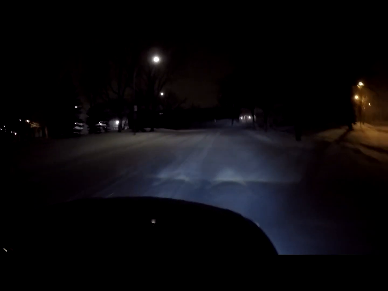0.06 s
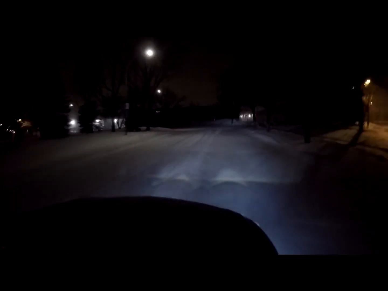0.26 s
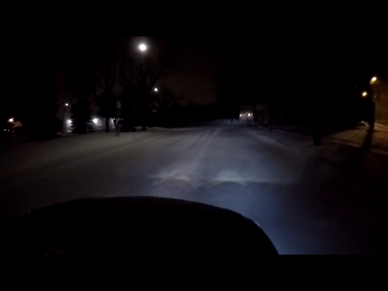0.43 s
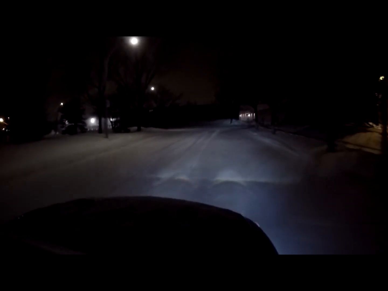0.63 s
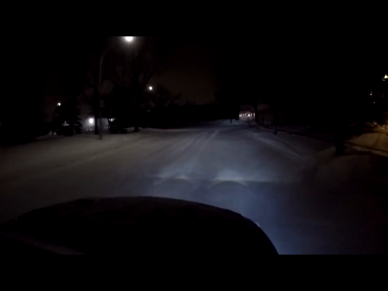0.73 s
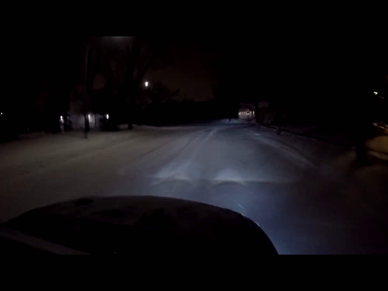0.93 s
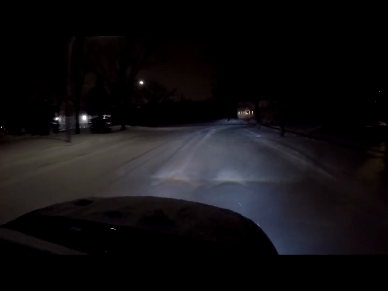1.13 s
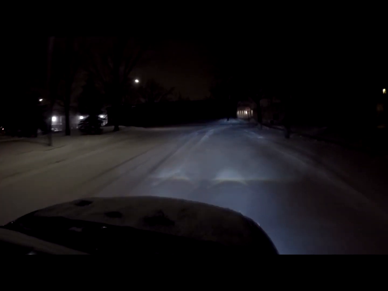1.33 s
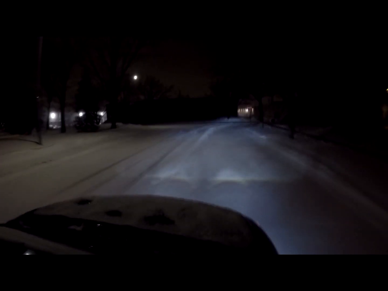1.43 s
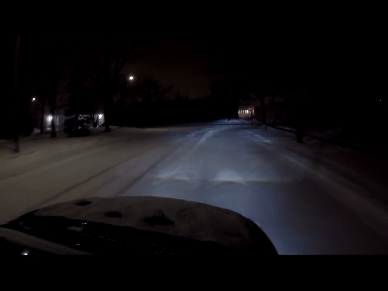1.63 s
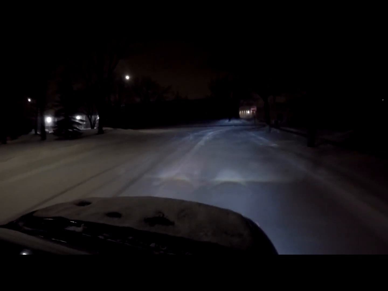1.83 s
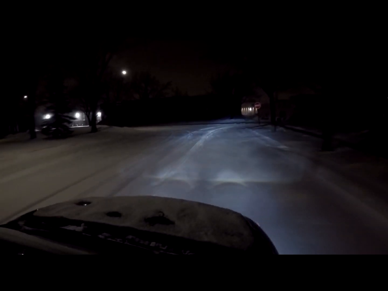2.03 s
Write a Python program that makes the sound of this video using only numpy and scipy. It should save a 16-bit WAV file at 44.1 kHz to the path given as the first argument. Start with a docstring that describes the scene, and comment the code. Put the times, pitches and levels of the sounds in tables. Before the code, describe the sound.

Heavy airstream roars and thumps against a cased microphone on a car driving along a road

```python
"""An airstream tears past a cased camera fixed outside a moving car.
Large eddies thump the case as low noise, with short low swells that stand out of it; small
ones rush over the microphone port as bright noise in short flurries, with sharp flutters.
Behind them lie a middle roar, a thin hiss, the car body's rumble and a few ticks of grit.
The noise layers are coloured and flickering; low swells and ticks are short swelling tones."""
import sys
import numpy as np
from scipy import signal
from scipy.fft import rfft, irfft
from scipy.io import wavfile
from scipy.ndimage import uniform_filter1d, minimum_filter1d

SR = 44100
rng = np.random.default_rng(int(sys.argv[2]) if len(sys.argv) > 2 else 0)


def generate_wav(signal):
    """Clip the signal to [-1, 1] and save it as 16-bit WAV at the path in sys.argv[1]."""
    frames = np.transpose(np.atleast_2d(signal))
    scaled = np.clip(frames, -1, 1) * 32767
    pcm = np.round(scaled).astype(np.int16)
    wavfile.write(sys.argv[1], SR, pcm)


N = 91110  # samples
SLEW_S = .005  # smoothing of every level curve


def undb(db):
    """Turn decibels into an amplitude factor."""
    return 10 ** (np.asarray(db) / 20)


def level_curve(table):
    """Draw a smoothed level line in dB through the table's points."""
    start_s, level_db = np.array(table).T
    line = np.interp(np.arange(N) / SR, start_s, level_db)
    return uniform_filter1d(line, int(SLEW_S * SR))


def walk(rate_hz):
    """Random levels held for 1 / rate_hz seconds and smoothed twice; spread about 0.6."""
    hold = int(SR / rate_hz)
    steps = np.repeat(rng.standard_normal(N // hold + 1), hold)
    smooth = uniform_filter1d(uniform_filter1d(steps, hold), hold)
    return 0.83 * smooth[:N]


def turbulence(colour, shared_db, shared_hz, own_db, own_hz):
    """Coloured noise, rms 1: half-octave bands flutter together and flicker alone.

    The two dB depths scale the random walks, the two rates in Hz set their pace.
    """
    hz = np.maximum(np.arange(N // 2 + 1) * SR / N, 1)
    pitch_hz, level_db = np.array(colour).T
    colour_db = np.interp(np.log(hz), np.log(pitch_hz), level_db, left=-80)
    spectrum = rfft(rng.standard_normal(N)) * undb(colour_db)
    noise = np.zeros(N)
    for centre_octave in np.arange(np.log2(pitch_hz[0]), np.log2(pitch_hz[-1]) + 1, .5):
        # triangular bands that crossfade into their neighbours
        share = np.clip(1 - 2 * np.abs(np.log2(hz) - centre_octave), 0, 1)
        noise += irfft(spectrum * share, N) * undb(own_db * walk(own_hz))
    noise *= undb(shared_db * walk(shared_hz))
    return noise / np.sqrt(np.mean(noise ** 2))


def swell(start_s, width_s):
    """Bell-shaped rise and fall around start_s; width_s is its standard deviation."""
    t = np.arange(N) / SR
    return np.exp(-.5 * ((t - start_s) / width_s) ** 2)


def tone_bursts(table, width_s):
    """Short swelling and fading tones with random phase."""
    t = np.arange(N) / SR
    out = np.zeros(N)
    for start_s, pitch_hz, level_db in table:
        phase = 2 * np.pi * rng.random()
        tone = np.sin(2 * np.pi * pitch_hz * (t - start_s) + phase)
        out += undb(level_db) * swell(start_s, width_s) * tone
    return out


# grains of grit on the housing: start_s (centre of the swell), pitch_hz, level_db (crest)
GRIT_TICKS = [(0.909, 6030, -32.5), (1.018, 9800, -51), (1.96, 7060, -52)]


def grit():
    """Grains tick against the housing, each a tiny pitched burst."""
    return tone_bursts(GRIT_TICKS, width_s=.0006)


# tone of the car body's rumble: pitch_hz, level_db (relative)
RUMBLE_TONE = [(14, -18), (30, 2), (50, -2), (80, -3.5), (110, -2.5), (160, -22)]


def rumble():
    """The car body rumbles underneath, as slowly wavering deep noise."""
    return undb(-24) * turbulence(RUMBLE_TONE, shared_db=2.5, shared_hz=6, own_db=2.5, own_hz=2.9)


# flurries of small eddies over the port: start_s, level_db
FLURRY_LEVEL = [(0.01, -23.5), (0.03, -24), (0.05, -25), (0.07, -29), (0.12, -26.5), (0.12, -28.5),
                (0.2, -26), (0.27, -29.5), (0.29, -22), (0.33, -27), (0.38, -30.5), (0.4, -19.5),
                (0.41, -24), (0.46, -28), (0.47, -20.5), (0.53, -18), (0.54, -30), (0.565, -19.5),
                (0.576, -27), (0.585, -19), (0.6, -26.5), (0.63, -29), (0.73, -22), (0.78, -28.5),
                (0.82, -23.5), (0.88, -29.5), (0.96, -28.5), (0.98, -25.5), (1.01, -26.5), (1.04, -28.5),
                (1.05, -33.5), (1.09, -22), (1.1, -28), (1.28, -32), (1.32, -23.5), (1.34, -29.5),
                (1.4, -19.5), (1.42, -29.5), (1.42, -21), (1.44, -32.5), (1.47, -20), (1.49, -34),
                (1.51, -34), (1.54, -19), (1.548, -22.5), (1.56, -17), (1.58, -25.5), (1.59, -18.5),
                (1.605, -24.5), (1.613, -22), (1.65, -29), (1.74, -27.5), (1.75, -17.5), (1.77, -30),
                (1.78, -30), (1.79, -23.5), (1.83, -32), (1.86, -22.5), (1.89, -28.5), (2.03, -25),
                (2.05, -25.5)]


def flurry_swing():
    """Swings of the flurries in dB about their mean, which hiss and roar partly follow."""
    flurry_db = level_curve(FLURRY_LEVEL)
    return flurry_db - flurry_db.mean()


# level of the hiss before it follows the flurries: start_s, level_db
HISS_LEVEL = [(0, -44), (.2, -46), (.42, -44.5), (.7, -47.5), (.95, -43.5), (1.2, -43.5), (1.45, -44.5),
              (1.67, -47.5), (2.06, -49)]
# tone of the hiss: pitch_hz, level_db (relative)
HISS_TONE = [(1500, -23), (3000, -9.5), (4300, -8.5), (5500, -10.5), (7000, -16), (8500, -25), (10000, -34),
             (12800, -56)]


def hiss():
    """Thin high noise of the airstream, leaning a little with the flurries."""
    noise = turbulence(HISS_TONE, shared_db=1.3, shared_hz=200, own_db=1.2, own_hz=45)
    return noise * undb(level_curve(HISS_LEVEL) + 0.22 * flurry_swing())


# level of the middle roar before it follows the flurries: start_s, level_db
ROAR_LEVEL = [(0.02, -20), (0.07, -18), (0.09, -20), (0.45, -19.5), (0.48, -19.5), (0.58, -21.5),
              (0.82, -19.5), (0.88, -23), (0.98, -15), (1.01, -21), (1.05, -13), (1.06, -21), (1.22, -15.5),
              (1.23, -24), (1.46, -15.5), (1.79, -23), (1.92, -18), (2.05, -21)]
# tone of the roar: pitch_hz, level_db (relative)
ROAR_TONE = [(150, -3.5), (280, -9), (390, 0), (560, -4), (800, -9), (1300, -23), (2600, -47.5)]


def roar():
    """Middle noise of the airstream, leaning a little with the flurries."""
    noise = turbulence(ROAR_TONE, shared_db=.8, shared_hz=40, own_db=1.2, own_hz=30)
    return noise * undb(level_curve(ROAR_LEVEL) + 0.3 * flurry_swing())


# sharp flutters at the port: start_s (centre of the swell), level_db
FLUTTER_PUFFS = [(0.053, -23), (0.284, -24), (0.394, -18), (0.4, -14), (0.479, -18.5), (0.526, -33),
                 (0.536, -24), (0.564, -22), (0.571, -26), (0.587, -23.5), (0.715, -20.5), (0.784, -21.5),
                 (0.809, -23), (0.972, -18.5), (1.079, -30.5), (1.317, -25), (1.389, -27), (1.538, -27),
                 (1.557, -32), (1.588, -23.5), (1.757, -20.5), (1.858, -19), (1.879, -22), (1.981, -22.5)]
# tone of the flutters: pitch_hz, level_db (relative)
FLUTTER_TONE = [(600, -11.5), (1500, 7.5), (2400, -3.5), (3100, -6.5), (4300, -7), (6000, -20), (8000, -34),
                (12800, -93.5)]


def flutters():
    """Bright puffs of air at the port swell and fade in a few milliseconds."""
    shape = sum(undb(level_db) * swell(start_s, width_s=.0013) for start_s, level_db in FLUTTER_PUFFS)
    return shape * turbulence(FLUTTER_TONE, shared_db=1.0, shared_hz=300, own_db=1.0, own_hz=100)


# tone of the rush over the port: pitch_hz, level_db (relative)
RUSH_TONE = [(300, -14), (650, -4), (1000, -0.5), (1600, -5.5), (2300, -9.5), (3100, -19.5), (4200, -18.5),
             (5500, -31.5), (7400, -48), (12800, -94)]


def rush():
    """Small eddies sweep over the port as grainy, fast-flickering noise."""
    eddies = turbulence(RUSH_TONE, shared_db=3.6, shared_hz=420, own_db=1.2, own_hz=90)
    return eddies * undb(level_curve(FLURRY_LEVEL))


# level of the low buffeting noise: start_s, level_db
BUFFET_LEVEL = [(0.0, -13), (0.07, -17.5), (0.16, -25.5), (0.23, -15), (0.30, -18.5), (0.45, -15),
                (0.62, -17), (0.78, -13.5), (0.88, -16), (1.04, -15), (1.11, -14), (1.2, -18),
                (1.48, -13.5), (1.55, -18), (1.61, -13), (1.65, -15.5), (1.7, -11), (1.82, -16.5),
                (1.9, -13.5), (2.06, -13)]
# tone of the thumping case: pitch_hz, level_db (relative)
THUMP_TONE = [(50, -21), (80, -0.5), (110, -2), (150, 0), (210, -2), (290, -4.5), (420, -19), (800, -36.5)]
# short low swells in the buffeting: start_s (centre of the swell), pitch_hz, level_db (crest)
LOW_SWELLS = [(0.065, 337, -11.5), (0.072, 213, -15.5), (0.088, 127, -14.5), (0.245, 210, -13.5),
              (0.27, 252, -14), (0.33, 168, -10.5), (0.49, 116, -11), (0.488, 318, -9.5), (0.55, 166, -8),
              (0.74, 217, -10.5), (0.776, 193, -12.5), (0.777, 387, -11), (0.82, 152, -8),
              (0.868, 280, -14), (1.05, 108, -24), (0.94, 157, -12.5), (0.985, 192, -10),
              (1.10, 161.5, -4.5), (1.41, 209, -11.5), (1.48, 117, -14.5), (1.61, 205, -11),
              (1.69, 125, -7), (1.74, 123, -9.5), (1.87, 215, -7.5), (1.89, 92, -7), (2.03, 169, -8.5)]


def buffeting():
    """Large eddies shake the case as low noise; short low swells stand out of it."""
    thump = turbulence(THUMP_TONE, shared_db=.6, shared_hz=25, own_db=1.8, own_hz=18)
    low_swells = tone_bursts(LOW_SWELLS, width_s=.0077)
    return thump * undb(level_curve(BUFFET_LEVEL)) + low_swells


def scene():
    """Stack the layers from the background to the buffeting, in one channel."""
    background = grit() + rumble() + hiss() + roar()
    airstream = flutters() + rush() + buffeting()
    return (background + airstream)[None]


def record(dry):
    """A limiter eases down peaks above its ceiling; a steep low-pass cuts the top."""
    ceiling, top_hz = .92, 12000
    span = int(.012 * SR)  # 12 ms
    gain = minimum_filter1d(ceiling / np.maximum(np.abs(dry), ceiling), 2 * span)
    gain = uniform_filter1d(uniform_filter1d(gain, span), span)
    low_pass = signal.ellip(8, .2, 70, top_hz, fs=SR, output="sos")
    return signal.sosfilt(low_pass, dry * gain)


dry = scene()
out = record(dry)
generate_wav(out)
```